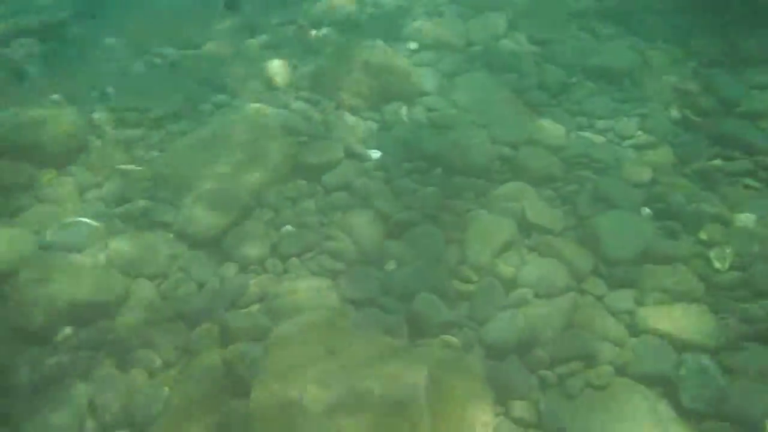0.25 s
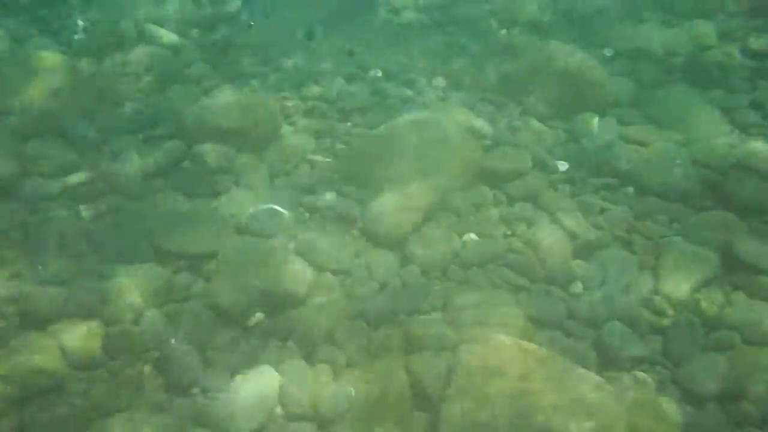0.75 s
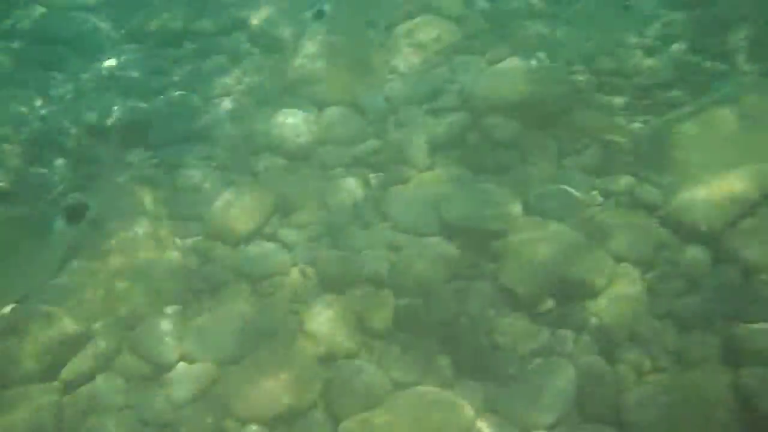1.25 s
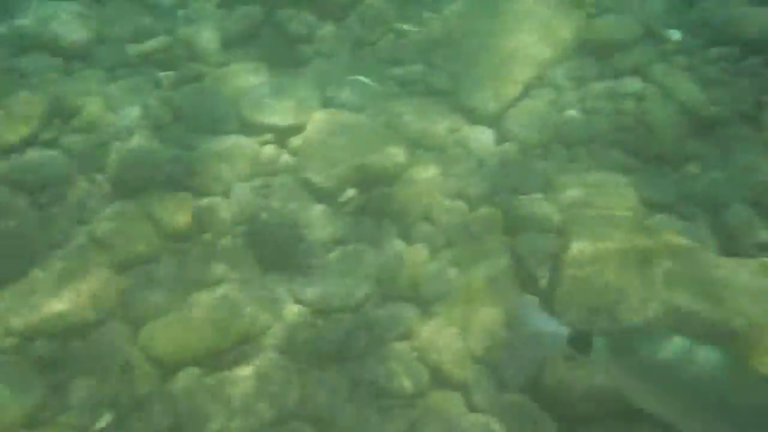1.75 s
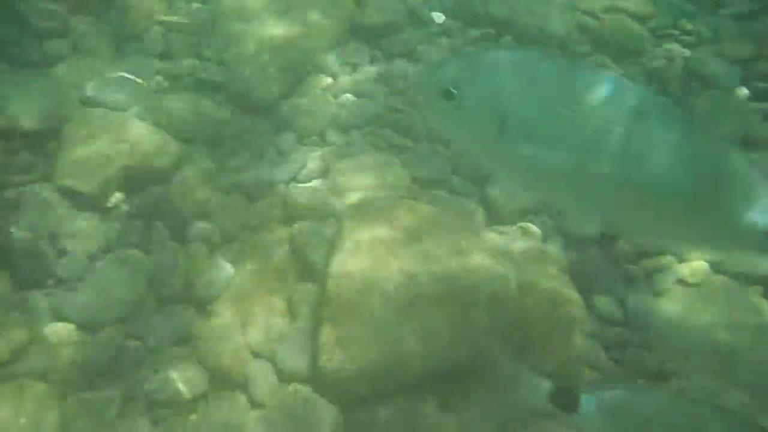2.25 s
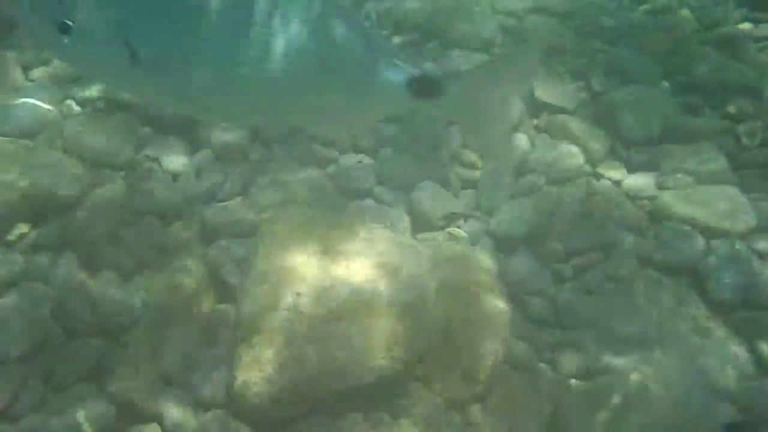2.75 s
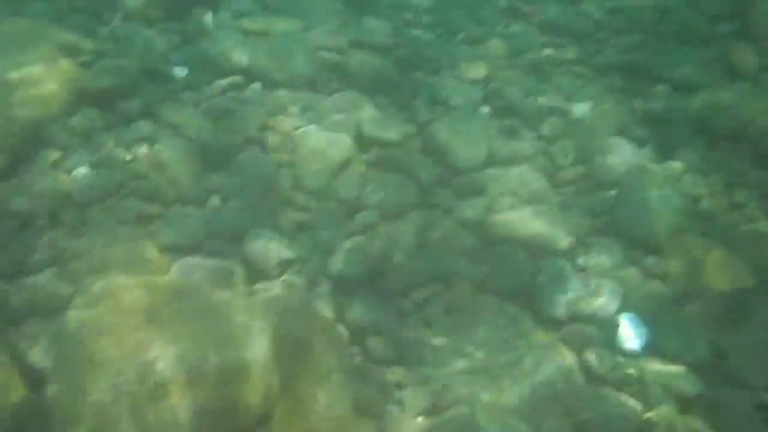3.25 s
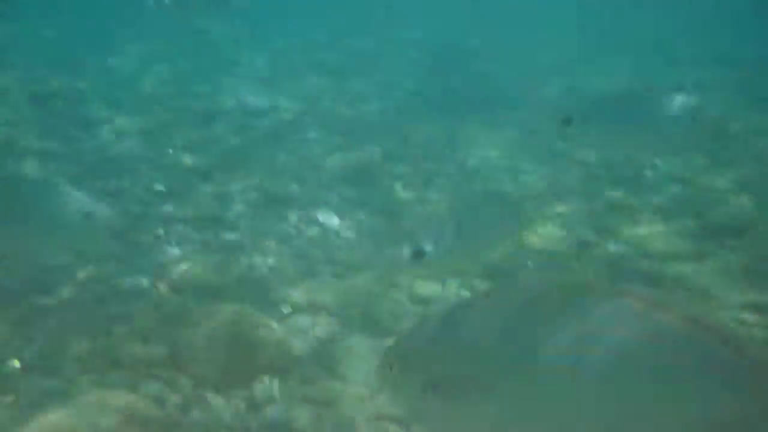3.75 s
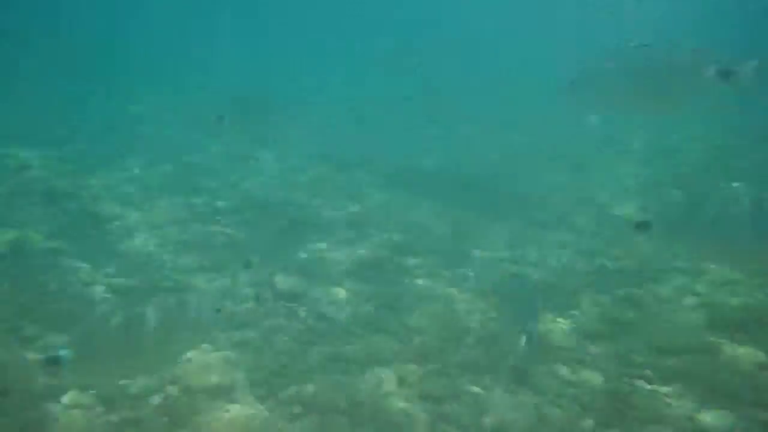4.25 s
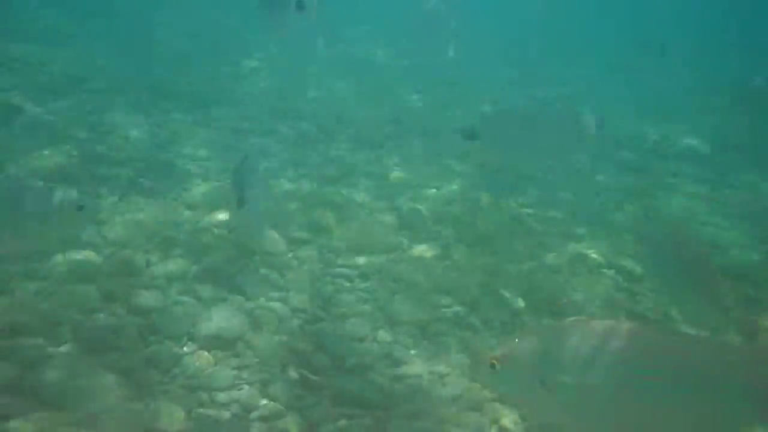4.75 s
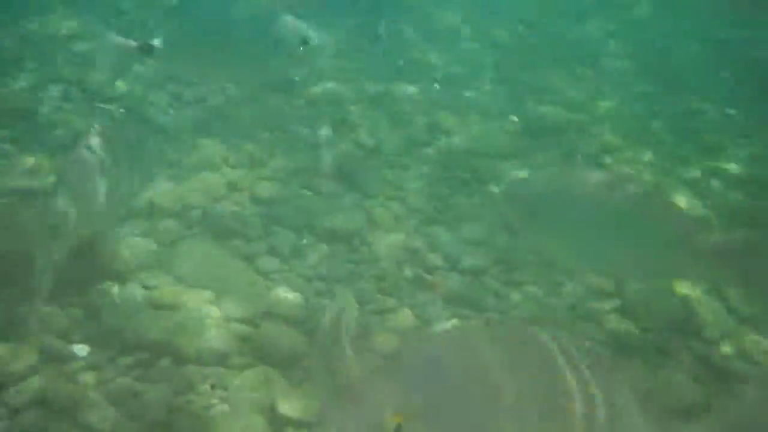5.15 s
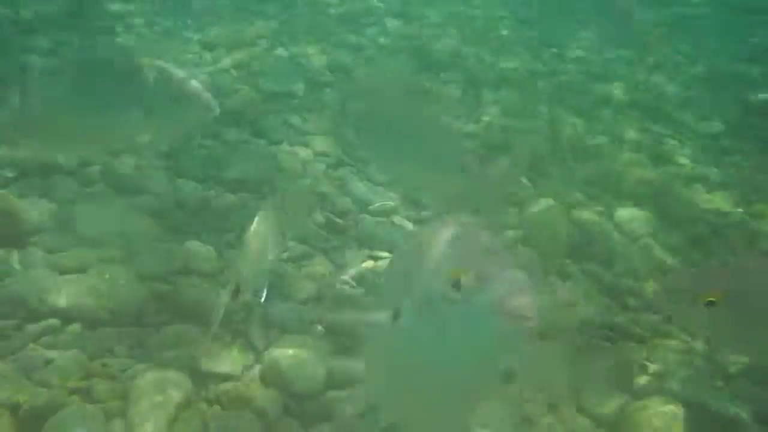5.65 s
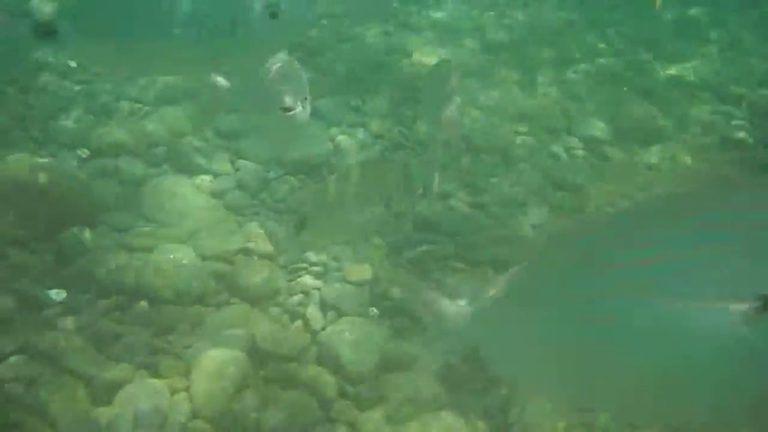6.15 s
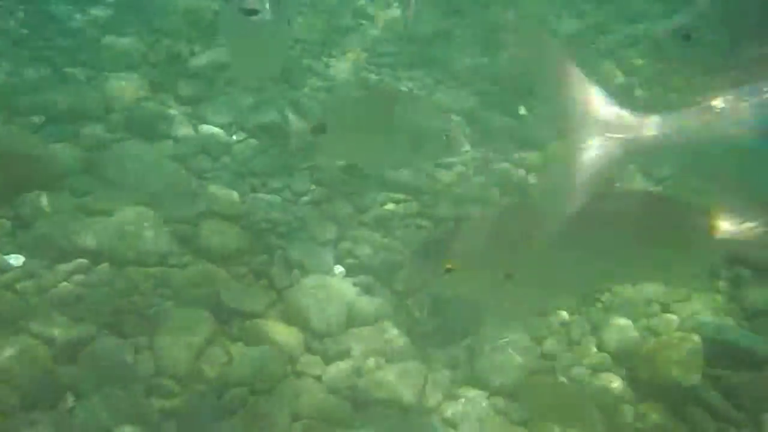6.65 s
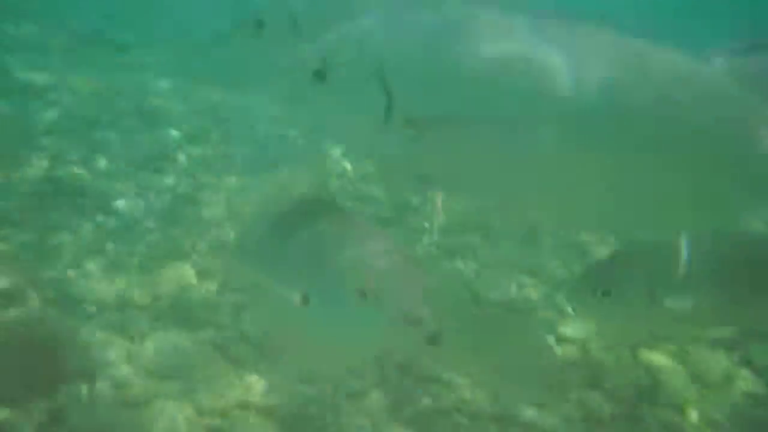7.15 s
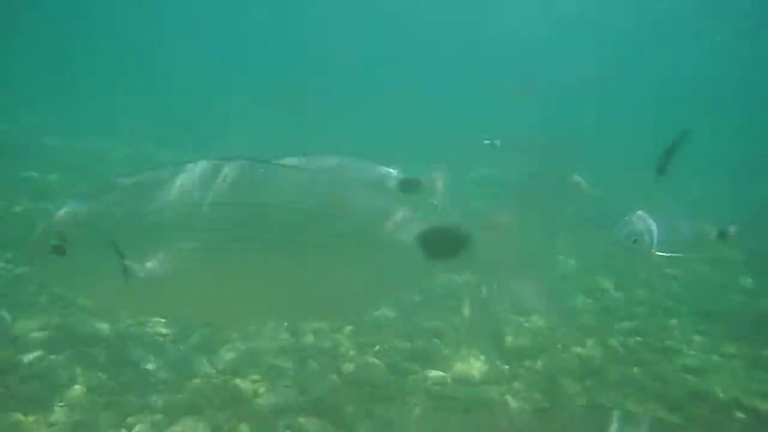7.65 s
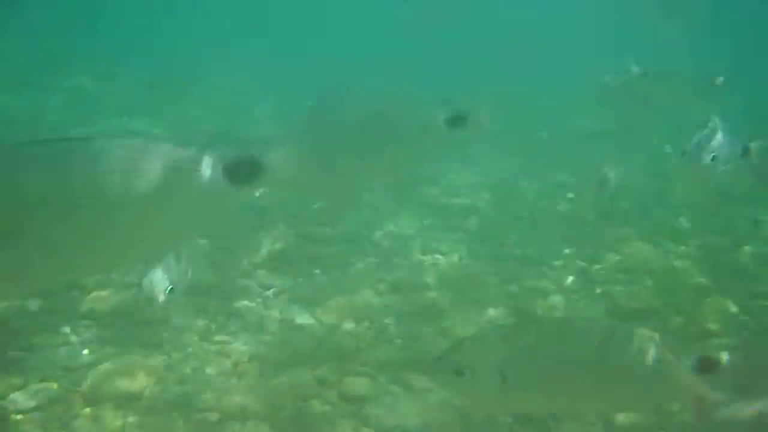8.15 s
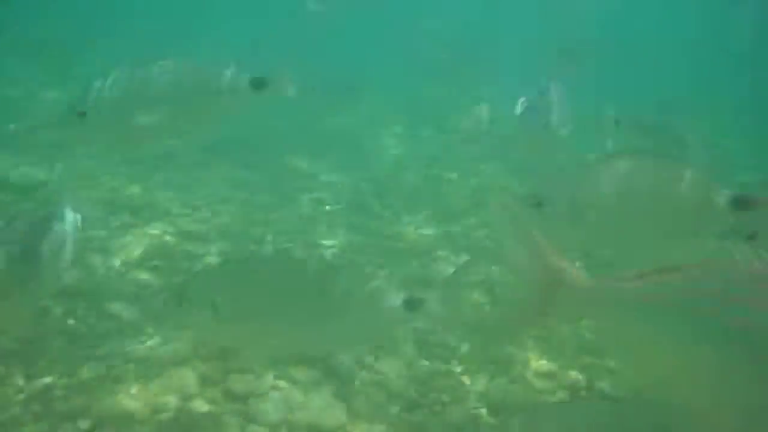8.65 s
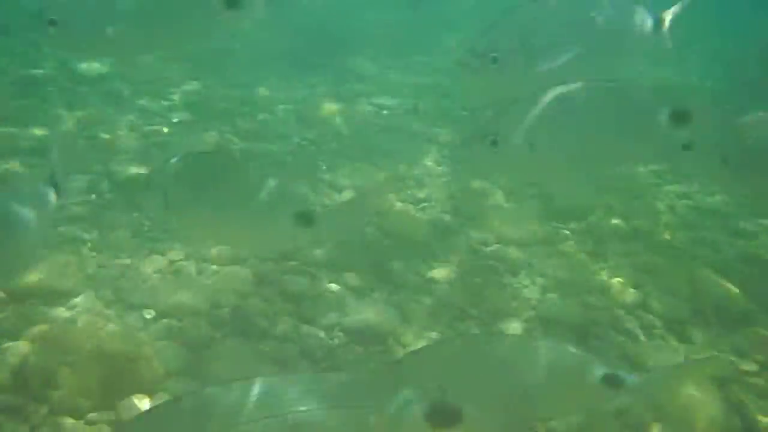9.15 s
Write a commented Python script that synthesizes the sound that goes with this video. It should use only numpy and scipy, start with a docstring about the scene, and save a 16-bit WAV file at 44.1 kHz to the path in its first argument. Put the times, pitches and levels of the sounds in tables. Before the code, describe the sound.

A steady, thin watery fizz with crackling in the middle distance, while fish glide by silently. Near snaps crack dry and boxy through the watertight housing, singly or in clusters, thickest between two and three seconds when bubbles gush. Short bubble blips, low gurgles and one touch on the case come early. Afterwards the hiss sways and settles; camera whine, faint hum and noise persist throughout.

```python
"""Shrimp snap sharply a short way off: scattered clicks that sound the watertight housing and ring at their own pitch.
Crackle fills the middle distance; fizz of tiny bubbles hisses steadily and surges in gushes, through that housing.
Larger bubbles ping as short sines, a touch knocks the housing, and water rumbles and gurgles along it.
The place is a shallow pebble bed; one microphone sits in a camera whose electronics whine, hum and hiss behind it all.
"""
import sys
import numpy as np
from scipy import signal
from scipy.fft import rfft, irfft
from scipy.io import wavfile
from scipy.ndimage import uniform_filter1d

SR = 44100
rng = np.random.default_rng(int(sys.argv[2]) if len(sys.argv) > 2 else 0)


def unload_wav(signal):
    """Save mono or channel-first audio to the path in sys.argv[1] as 16-bit WAV at rate SR, clipped to [-1, 1]."""
    wavfile.write(
        sys.argv[1],
        SR,
        np.round(np.clip(np.atleast_2d(signal).T, -1, 1) * 32767).astype(np.int16),
    )


N = 414540
TIME = np.arange(N) / SR  # [s]


# near snaps: (time [s], level before a common trim [dB], pitch [Hz],
#              treble above 4.5 kHz relative to that level [dB], ring time [s])
NEAR_SNAPS = [(0.0327, -23.5, 3650, -3, 0.0039), (0.0946, -14.5, 3130, -19, 0.0012),
              (0.345, -42, 2200, -25, 0.0034), (0.66, -29.5, 3160, -28, 0.019),
              (0.735, -37.5, 3400, -18, .0025), (0.7946, -30.5, 3970, -11, 0.0036),
              (1.103, -32.5, 1810, -10, 0.0084), (1.3375, -34, 3650, -2.5, 0.0012),
              (1.4142, -28.5, 3170, -8, .003), (1.5966, -35.5, 1520, -10, 0.0033),
              (1.6298, -16, 2940, -9.5, 0.0053), (1.645, -29.5, 2620, -16, 0.0095),
              (2.1848, -16.5, 2720, -16, 0.0021), (2.1937, -15, 3200, -14, 0.0011),
              (2.2722, -16, 2600, -14, .0028), (2.2837, -20, 3500, -20, 0.001),
              (2.352, -31, 2980, -14, 0.005), (2.4278, -19, 3780, -15, .004),
              (2.4718, -21, 2420, -11, 0.0059), (2.5125, -18, 1820, -22, 0.0011),
              (2.534, -24.5, 2600, 0, 0.0026), (2.5415, -14, 3000, -16.5, 0.0046),
              (2.6421, -15.5, 3240, -18.5, .004), (2.7321, -18, 3450, -10, 0.0015),
              (2.7635, -20.5, 3000, -9.5, 0.0028), (2.985, -28.5, 1880, -14, .006),
              (3.0422, -26.5, 3780, -21, 0.0049), (3.084, -22.5, 2490, -13.5, 0.0065),
              (3.186, -25, 1740, -14.5, 0.0032), (3.4036, -29, 3230, -8, 0.0027),
              (3.658, -32.5, 3830, -6, 0.0032), (3.7231, -21.5, 2650, -12, 0.0038),
              (3.828, -34.5, 3860, -14, .0019), (3.9826, -29.5, 2860, -30, 0.0027),
              (4.1042, -31, 3000, -24, 0.0053), (4.1387, -29, 3080, -6.5, .008),
              (4.3713, -29.5, 3400, -14, 0.0037), (4.4542, -31.5, 2230, -28, 0.0059),
              (4.4725, -30, 2000, -23, .002), (4.605, -28, 3080, -18, 0.018),
              (4.661, -28, 3150, -3.5, 0.0023), (4.8232, -26.5, 3210, -19, 0.0014),
              (4.9885, -34.5, 3660, -21, .005), (5.004, -31, 3150, -13, .004),
              (5.128, -29, 2780, -14, 0.0079), (5.151, -28.5, 3000, -3.5, 0.0027),
              (5.248, -39, 3200, -3.5, .0025), (5.2788, -26, 3150, -8.5, 0.00086),
              (5.3386, -27.5, 2200, -4, 0.0014), (5.456, -37.5, 3000, 0, 0.0014),
              (5.6102, -34, 1860, -22, 0.0012), (5.907, -19, 3500, -17, 0.0026),
              (5.9938, -33, 2880, -11, .003), (6.124, -41, 3730, -24, 0.0034),
              (6.1398, -32, 3450, -2.5, 0.0022), (6.3007, -26, 1940, -5.5, 0.0017),
              (6.4675, -35, 2260, -7.5, 0.012), (6.6528, -31.5, 2880, -14, 0.0014),
              (6.7691, -18, 2810, -15, 0.0047), (7.1712, -29, 3440, -8, 0.004),
              (7.372, -26, 2190, -22, 0.0018), (7.597, -35, 2660, -19, .006),
              (7.6351, -27.5, 1930, -18, 0.001), (7.6813, -40, 3000, -10, 0.0023),
              (7.6866, -18.5, 3550, -14, 0.0017), (7.7752, -31.5, 3500, -7, 0.012),
              (7.817, -34.5, 2900, -19, 0.0013), (7.8805, -32.5, 3130, -12, 0.0011),
              (7.9672, -25.5, 3330, -11.5, 0.0011), (8.041, -26, 3100, -23, 0.0015),
              (8.096, -21.5, 2950, -33, 0.0014), (8.139, -25, 3130, -9.5, 0.0034),
              (8.216, -24, 1840, -16, 0.0021), (8.3827, -41.5, 2300, 7, 0.0027),
              (8.6449, -22.5, 1880, -28, 0.0022), (8.946, -40.5, 2400, -4, 0.0016),
              (8.997, -23, 3840, -8.5, 0.0021), (9.0502, -21.5, 1860, -14.5, 0.0027)]
# bands in which a snap's colour is set: (low edge [Hz], high edge [Hz])
SNAP_COLOUR_BANDS = [(500, 1400), (1400, 2600), (2600, 4500), (4500, 10000)]


def snaps():
    """A near snap rings at its own pitch and sounds the housing too; its colour follows its pitch."""
    echo_db, echo_s = -21, 0.014  # the tail that bed and surface give every snap
    trim_db = 1.5
    ring = housing(between_db=-20.0)
    cracks = []
    for _, _, hz, _, ring_s in NEAR_SNAPS:
        burst = scatter(ring_s, tail_db=echo_db, tail_s=echo_s)
        through_housing = evened(signal.fftconvolve(burst, ring)[:len(burst)])
        direct = burst * np.exp(-TIME[:len(burst)] / 0.0077)  # late echoes have lost the pitch
        own_ring = evened(resonate(resonate(direct, hz, cycles=1.6), hz, cycles=1.6))
        cracks.append(through_housing + gain_of(-8.5) * own_ring)
    out = np.zeros(N)
    first = SR // 100  # each band is levelled on its first 10 ms
    for k, (lo_hz, hi_hz) in enumerate(SNAP_COLOUR_BANDS):
        parts = band(np.array(cracks), lo_hz, hi_hz)
        for (s, db, hz, treble_db, _), part in zip(NEAR_SNAPS, parts):
            level = gain_of(db + snap_colour(hz, treble_db)[k])
            add(out, s, level * part / np.sqrt(np.mean(part[:first] ** 2)))
    return gain_of(trim_db) * out


def snap_colour(hz, treble_db):
    """A snap's level in each band, relative to its strongest; the fall steepens towards the bass."""
    below_db, above_db = 12.5, 6.5  # fall over the first octave below and above the pitch
    centre_hz = np.sqrt(np.prod(SNAP_COLOUR_BANDS[:-1], axis=1))
    octaves = np.log2(centre_hz / hz)
    bass_fall_db = below_db * np.maximum(-octaves, 0) ** 1.29
    body_db = -bass_fall_db - above_db * np.maximum(octaves, 0)
    return np.append(body_db - body_db.max(), treble_db)


def scatter(ring_s, tail_db, tail_s, size=3000):
    """One click scattered by the stones: a tight cluster of echoes, then a thin tail from bed and surface."""
    t = np.arange(size) / SR
    cluster = np.exp(-t / ring_s) * (1 - np.exp(-t / 0.00081))
    tail = gain_of(tail_db) * np.exp(-t / tail_s)
    return rng.standard_normal(size) * np.hypot(cluster, tail)


# resonances of the housing round the microphone: (pitch [Hz], width at half amplitude [Hz], relative level [dB])
HOUSING_RESONANCES = [(252, 400, -20.5), (662, 107, -4), (1095, 198, 0), (1797, 290, -2.5),
                      (2129, 355, 5.5), (2946, 410, -1.5), (3313, 490, 4), (3664, 930, -2),
                      (5630, 1900, -8.5), (7900, 5400, -19.5)]


def housing(between_db, size=4096):
    """The causal ring of the housing; between_db is what passes between its resonances."""
    hz = abs(np.fft.fftfreq(size, 1 / SR))
    power = sum((gain_of(db) / (1 + (2 * (hz - f) / width) ** 2)) ** 2 for f, width, db in HOUSING_RESONANCES)
    leak = (gain_of(between_db) / (1 + (hz / 4500) ** 4)) ** 2
    power = power + leak * hz ** 4 / (hz ** 4 + 700 ** 4)
    power = power * hz ** 4 / (hz ** 4 + 130 ** 4)  # the microphone passes no deep bass
    log_gain = np.log(power + 1e-10) / 2
    minimum_phase = np.exp(np.conj(signal.hilbert(log_gain)))
    return np.fft.ifft(minimum_phase).real[:size // 2]


# gushes of fine bubbles, the big rush among them:
# (start time [s], hold [s], level before fizz trims [dB], fade [dB per s])
BUBBLE_GUSHES = [(2.124, 0.011, -22, 21), (2.188, 0.16, -19.5, 28.5), (8.102, 0.26, -38, 58),
                 (8.845, 0.015, -36.5, 65)]


def gush_level():
    """Each gush builds quickly, holds, and fades at a steady dB rate; gives their joint level in dB."""
    ragged_db = 2.25  # the bubble cloud of a gush arrives in lumps
    power = np.full(N, 1e-12)
    for s, hold_s, db, fade_db_per_s in BUBBLE_GUSHES:
        rise_s = 0.0035 + 0.043 * hold_s  # a longer gush also takes longer to build
        faded_db = fade_db_per_s * np.maximum(TIME - s - rise_s - hold_s, 0)
        rise = np.clip((TIME - s) / rise_s, 0, 1)
        power += (rise * gain_of(db - np.minimum(faded_db, 100))) ** 2
    return 10 * np.log10(power) + ragged_db * drift(per_s=43)


# steady fizz, which also sways the far crackle: (time [s], level before fizz trims [dB])
STEADY_FIZZ = [(0, -37), (0.25, -45.5), (0.5, -43.5), (1.05, -40), (1.5, -37), (1.85, -42.5), (2.7, -34),
               (3.15, -34), (3.46, -40), (3.75, -34.5), (4.2, -35), (4.5, -43.5), (5.05, -38), (5.5, -45.5),
               (6.6, -44.5), (7.05, -47), (8.5, -44.5), (9.4, -46)]


def steady_level():
    """The level in dB of the steady fizz, gliding from row to row."""
    level_db, = follow(STEADY_FIZZ)
    return level_db


def fizz(level_db, coarse_db, blur_db, between_db, spray_db):
    """Tiny bubbles over a smooth far hiss; in a rush they crowd so closely that they blur into it."""
    grains = swarm(lo_hz=580, hi_hz=8500, cycles=3.2, per_s=140, spread_db=4.8, most=3.3, count=32)
    blur = gain_of(blur_db) * rng.standard_normal(N)
    water = signal.oaconvolve(grains + blur, housing(between_db))[:N]
    # level the random bubbles over each fifth of a second, so that the given level sets the loudness
    water /= np.sqrt(uniform_filter1d(water ** 2, SR // 5))
    # trims: coarse +0.5 dB, fine -1.93 dB
    coarse = evened(band(water, 453, 1366, order=4)) * gain_of(coarse_db + 0.5)
    fine = evened(band(water, 1400, 4180, order=4)) * gain_of(level_db - 1.93)
    spray = evened(band(water, 4030, 6300, order=2)) * gain_of(level_db + spray_db)
    return coarse + fine + spray


def swarm(lo_hz, hi_hz, cycles, per_s, spread_db, most, count):
    """Bubbles of many sizes, each ringing a few cycles at its own pitch; each size comes and goes in clumps."""
    out = np.zeros(N)
    for hz in np.geomspace(lo_hz, hi_hz, count):
        clumps = gain_of(3.5 * drift(per_s=18))
        out += resonate(clumps * clicks(per_s, spread_db, most), hz, cycles)
    return evened(out)


def crackle(level_db, count=10):
    """Snaps at middle distance, each patch of the bed with its own pitch; busier water crackles louder."""
    ring = housing(between_db=-65)
    out = np.zeros(N)
    clusters = gain_of(2.5 * np.clip(drift(per_s=9), -2, 1.2))  # shared by all patches
    for hz in np.geomspace(1700, 5800, count):
        burst = scatter(.0018, tail_db=-16, tail_s=.009)
        tick = band(signal.fftconvolve(burst, ring), hz / 1.28, hz * 1.53, order=2)
        hits = clusters * clicks(per_s=7, spread_db=5.5, most=2)
        out += signal.oaconvolve(hits, tick)[:N]
    busy_db = .55 * (level_db - np.median(level_db))
    return evened(out) * gain_of(-43 + busy_db)


# large single bubbles: (time [s], pitch [Hz], peak level before a common trim [dB], ring time [s])
LARGE_BUBBLES = [(0.02, 260, -52, 0.0077), (0.025, 770, -39.5, 0.0046), (0.382, 1730, -32.5, 0.0031),
                 (0.683, 1020, -30, .0031), (0.895, 665, -37, 0.0038), (1.007, 2020, -30.5, .002),
                 (1.122, 2040, -33, 0.003), (1.285, 950, -37, 0.0027), (1.319, 563, -41.5, .0033),
                 (1.324, 273, -50, 0.0082), (1.397, 1760, -33, .0014), (1.406, 744, -40.5, 0.0081),
                 (1.46, 1047, -39, 0.0054), (1.576, 450, -41, 0.0025), (1.599, 440, -44, .0025),
                 (2.526, 652, -32, .0055), (2.734, 1710, -22, 0.0024), (2.787, 1040, -30.5, .004),
                 (2.819, 1690, -21, 0.0037), (3.196, 390, -28.5, 0.0017), (4.046, 1105, -27.5, 0.0036),
                 (5.645, 1860, -30, 0.0014), (7.338, 2100, -31, 0.0016), (6.355, 1125, -41, 0.0046),
                 (8.267, 1620, -29.5, 0.0031), (8.559, 1080, -38, 0.0022), (8.866, 307, -54, 0.0069),
                 (9.198, 2200, -29.5, 0.0042)]


def bubbles(size=2600):
    """A freed bubble rings as a short sine whose pitch creeps up as it rises."""
    trim_db = 3.0
    out = np.zeros(N)
    t = np.arange(size) / SR
    for s, hz, db, ring_s in list(LARGE_BUBBLES) + stray_bubbles():
        age = t / ring_s
        swell = age * np.exp(1 - age)  # peaks at 1 after one ring time
        creep = 1 + 0.47 * (t - ring_s)
        add(out, s, gain_of(db) * swell * np.sin(2 * np.pi * hz * t * creep))
    return gain_of(trim_db) * out


def stray_bubbles(count=18):
    """Small bubbles at random moments, higher ones louder and shorter, as rows like those of the large ones."""
    low_hz, high_hz = 597, 2260
    low_db, db_per_octave, low_ring_s = -51, 6.5, .004  # level (before the trim) and ring at the lowest pitch
    when, size = rng.random((count, 2)).T
    octaves = size * np.log2(high_hz / low_hz)
    hz = low_hz * 2 ** octaves
    ring_s = low_ring_s / np.sqrt(2 ** octaves)
    return list(zip(when * N / SR, hz, low_db + db_per_octave * octaves, ring_s))


# knocks on the housing, right at the microphone: (time [s], peak level [dB], pitch [Hz], ring time [s])
HOUSING_KNOCKS = [(1.1456, -3, 630, 0.00061), (2.53, -30, 153, 0.0016)]


def knocks():
    """A touch on the housing: a sudden push that swings back, dying away fast."""
    out = np.zeros(N)
    t = np.arange(SR // 20) / SR
    for s, db, hz, ring_s in HOUSING_KNOCKS:
        swing = np.exp(-t / ring_s) * np.sin(2 * np.pi * hz * t)
        push = np.diff(swing)
        add(out, s, gain_of(db) * push / abs(push).max())
    return out


# swirls of water against the housing: (middle time [s], half length [s], level before the rumble's trim [dB])
WATER_SWIRLS = [(0.0, 0.1, -57), (1.24, 0.1, -53), (1.57, 0.08, -53), (2.764, 0.4, -60.5),
                (4.78, 0.18, -59), (7.3, 0.12, -67), (8.87, 0.019, -58)]
# colour of the washing water: (frequency [Hz], relative level per Hz [dB])
WASH_SPECTRUM = [(30, -25), (80, -18.5), (150, -12), (265, 0.5), (400, -16.5), (660, 9), (1000, -12.5),
                 (1800, -18)]


def wash():
    """Water moving along the housing rumbles softly, and gurgles when a swirl stirs it harder."""
    calm_db = -64.5  # before the rumble's +4.5 dB trim
    swirls_db = [db - 20 * np.log10(1 + ((TIME - s) / half_s) ** 4) / 2 for s, half_s, db in WATER_SWIRLS]
    level_db = together(calm_db, *swirls_db)
    eddies = clicks(per_s=1500, spread_db=3.5, most=3.5)
    blobs = swarm(lo_hz=400, hi_hz=1200, cycles=3, per_s=40, spread_db=3, most=2.5, count=12)
    rumble = gain_of(level_db + 4.5) * coloured(eddies, WASH_SPECTRUM)
    gurgle = band(blobs, 310, 1360) * gain_of(-67.5 + 1.57 * (level_db - calm_db))
    return rumble + gurgle


# the camera's whine, one row a tone: (spectral line [Hz], pitch within each scan [Hz])
WHINE_TONES = [(10413.4, 10450), (10740, 10773), (11228.3, 11269)]
# level of each of those tones before the band-pass: (level [dB])
WHINE_LEVELS = [-62.5, -50.5, -55.5]
# the camera's hum: (time [s], pitch [Hz], level [dB])
CAMERA_HUM = [(0, 189, -81), (2, 186.7, -71), (3.9, 188, -69), (5.3, 189.8, -70), (7, 185.5, -74.5),
              (8.2, 180.7, -82.5), (9.4, 181.3, -84)]
# colour of the microphone amplifier's hiss: (frequency [Hz], relative level per Hz [dB])
HISS_SPECTRUM = [(30, -46), (120, -18), (250, -12), (600, -15.5), (2000, 7.5), (6000, -1), (9800, -1.5),
                 (10800, -4.5), (11600, -35), (12200, -35)]


def electronics():
    """High tones that restart at every scan, a faint hum and the amplifier's hiss."""
    scans_per_s = 81.66
    since_scan = TIME % (1 / scans_per_s)
    whine = np.zeros(N)
    for (line_hz, pitch_hz), db in zip(WHINE_TONES, WHINE_LEVELS):
        turns = line_hz * TIME + (pitch_hz - line_hz) * since_scan
        whine += gain_of(db) * evened(np.sin(2 * np.pi * turns))
    whine = band(whine, 8500, 11700, order=3)
    hum_hz, hum_db = follow(CAMERA_HUM)
    hum = gain_of(hum_db) * evened(np.sin(2 * np.pi * np.cumsum(hum_hz) / SR))
    hiss = gain_of(-48.0) * coloured(rng.standard_normal(N), HISS_SPECTRUM)
    return whine + hum + hiss


def clicks(per_s, spread_db, most):
    """Random clicks of either sign, many faint and a few strong, at rms 1."""
    at, strength, sign = rng.random((int(per_s * N / SR) + 1, 3)).T
    height_db = spread_db * np.minimum(-np.log(1 - strength), most)
    height = gain_of(height_db) * np.sign(sign - .5)
    return evened(np.bincount((at * N).astype(int), height, N))


def resonate(x, hz, cycles):
    """A resonance of gain about 1 whose ring falls to 1/e in so many cycles."""
    r = np.exp(-hz / cycles / SR)
    feed = np.array([1, 0, -1]) * (1 - r * r) / 2
    return signal.lfilter(feed, [1, -2 * r * np.cos(2 * np.pi * hz / SR), r * r], x)


def drift(per_s):
    """A slow random wander: straight lines between random knots of rms 1."""
    knots = rng.standard_normal(int(per_s * N / SR) + 2)
    return np.interp(TIME * per_s, np.arange(len(knots)), knots)


def band(x, lo_hz, hi_hz, order=3):
    """Causal band-pass."""
    edges_hz = [lo_hz, min(hi_hz, SR / 2 - 1)]
    return signal.sosfilt(signal.butter(order, edges_hz, "band", fs=SR, output="sos"), x)


def coloured(x, points):
    """Gives a steady sound a spectrum, drawn over log frequency, at rms 1."""
    hz, db = np.transpose(points)
    bins_hz = np.fft.rfftfreq(N, 1 / SR)
    curve_db = np.interp(np.log(bins_hz + 1), np.log(hz), db)
    return evened(irfft(rfft(x) * gain_of(curve_db), N))


def follow(rows):
    """The columns of a curve at every sample."""
    s, *columns = np.transpose(rows)
    return [np.interp(TIME, s, c) for c in columns]


def add(mix, s, sound):
    """Mixes a sound in at a time."""
    part = mix[max(round(s * SR), 0):][:len(sound)]
    part += sound[:len(part)]


def together(*levels_db):
    """The level of several unrelated sounds at once."""
    return 10 * np.log10(sum(gain_of(db) ** 2 for db in levels_db))


def gain_of(db):
    """Decibels to amplitude."""
    return 10 ** (np.asarray(db) / 20)


def evened(x):
    """Scales to rms 1."""
    return x / np.sqrt(np.mean(x ** 2) + 1e-20)


def scene():
    """Everything that reaches the one microphone; a gush is smoother and broader than the steady fizz."""
    steady_db = steady_level()
    gush_db = gush_level()
    # coarse bubbles lie 12.5 dB below the steady level, 22 dB below a gush's, before the fizz trims
    steady = fizz(steady_db, steady_db - 12.5, blur_db=-5.5, between_db=-17.0, spray_db=-15.0)
    gushes = fizz(gush_db, gush_db - 22, blur_db=-4.5, between_db=-12.5, spray_db=-13)
    far_snaps = crackle(together(steady_db, gush_db))
    water = snaps() + gushes + steady + far_snaps + bubbles()
    return (water + knocks() + wash() + electronics())[None]


def record(dry):
    """The loudest snaps are rounded off; then the bass cut and the band limit."""
    held = dry / (1 + (dry / .85) ** 8) ** (1 / 8)
    thin = signal.sosfilt(signal.butter(1, 80, "high", fs=SR, output="sos"), held)
    band_limit = signal.firwin(255, 12000, window=("kaiser", 8), fs=SR)  # low-pass at 12 kHz
    return signal.oaconvolve(thin, band_limit[None], "same")


dry = scene()
out = record(dry)
unload_wav(out)
```